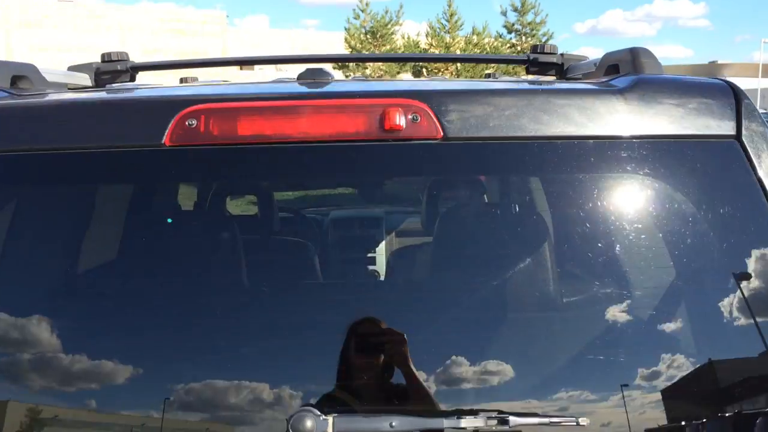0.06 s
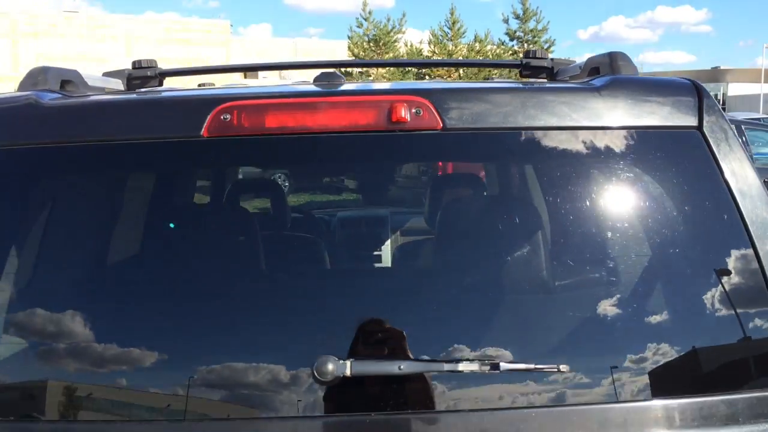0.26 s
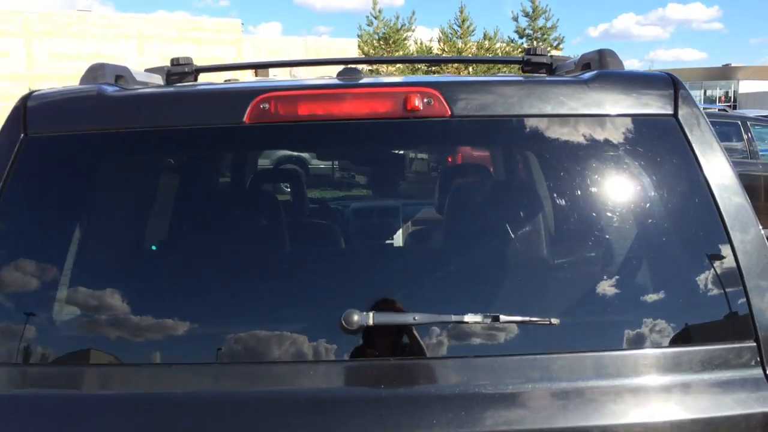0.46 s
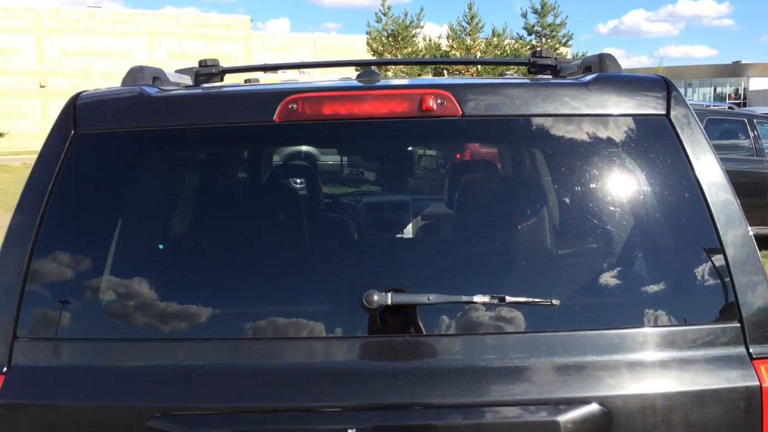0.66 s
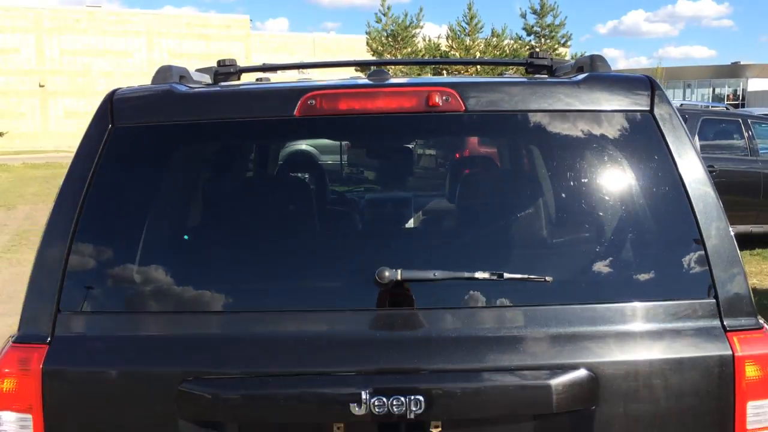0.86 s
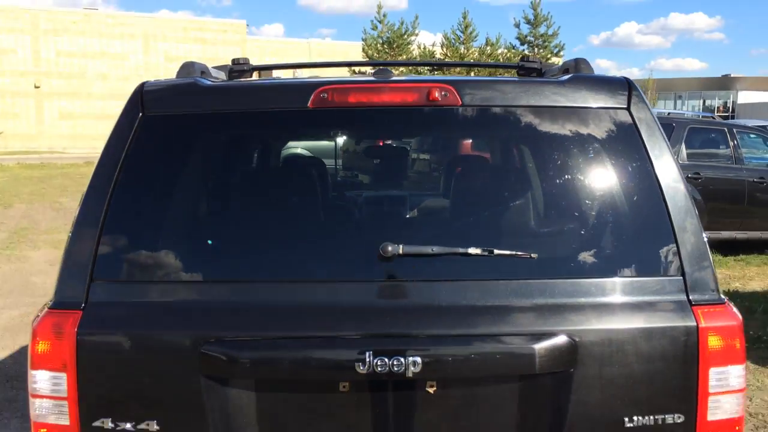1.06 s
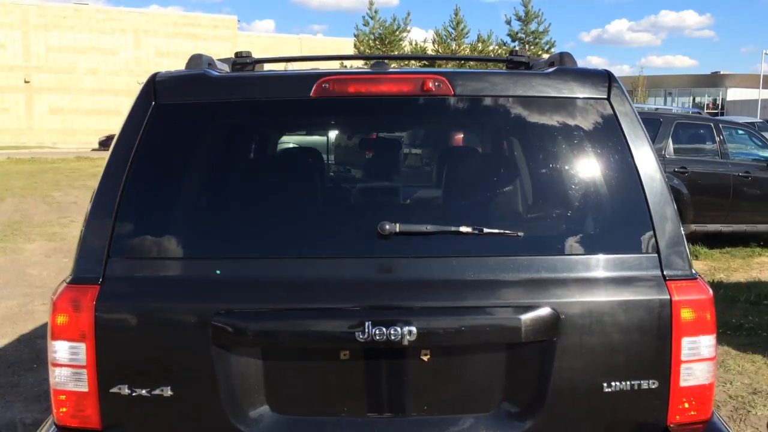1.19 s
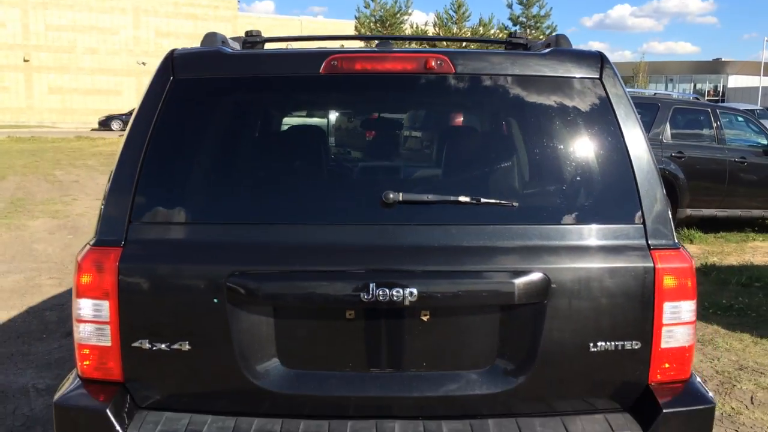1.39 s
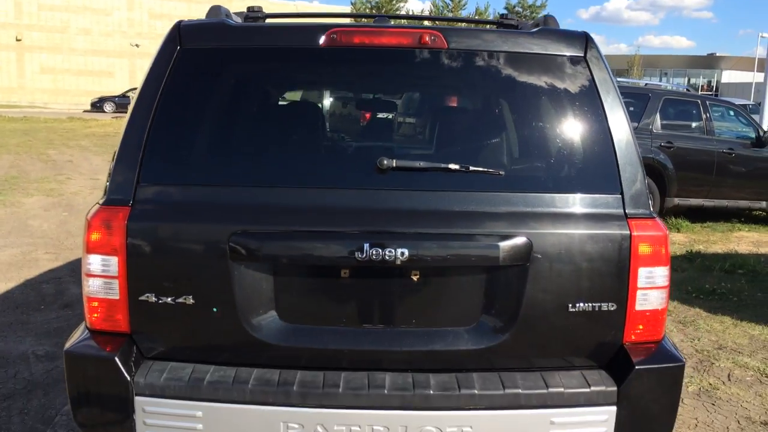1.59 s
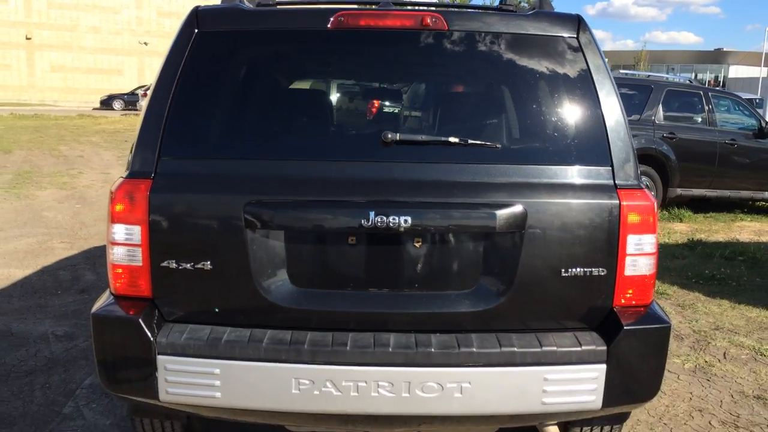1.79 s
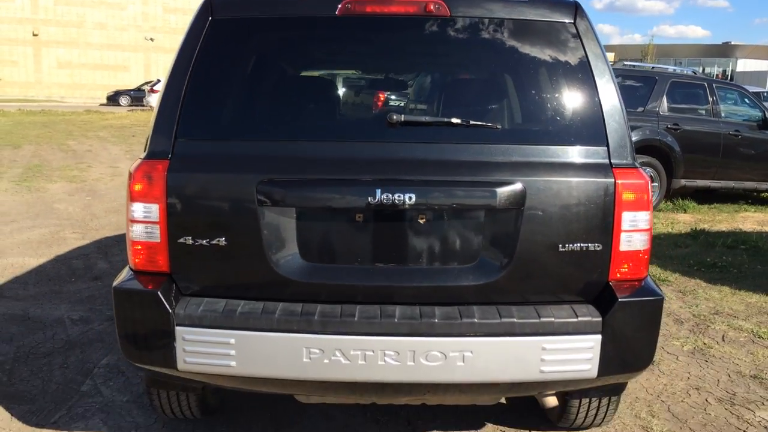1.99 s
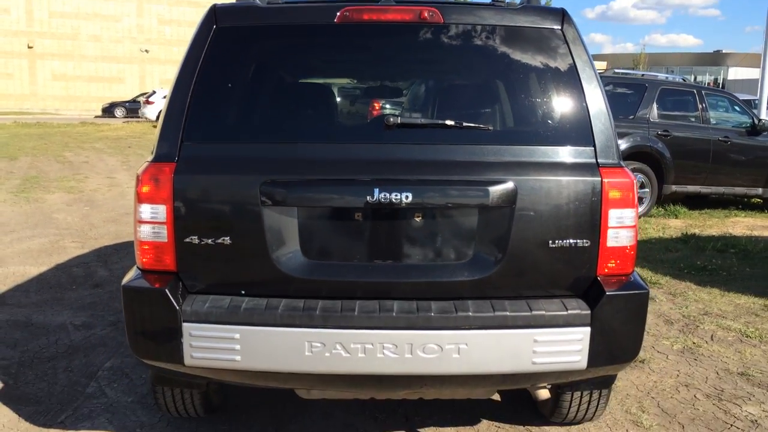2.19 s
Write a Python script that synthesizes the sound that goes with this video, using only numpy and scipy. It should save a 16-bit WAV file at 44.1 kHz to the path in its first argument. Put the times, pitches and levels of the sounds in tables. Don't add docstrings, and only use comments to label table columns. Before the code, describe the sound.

A vehicle's rear gate slams almost at once, a deep thud with metallic latch clack and brief faint rattle, close up in an open lot; afterwards wind bumps a hand-held microphone over faint distant traffic.

```python
import sys
import numpy as np
from scipy import signal
from scipy.fft import rfft, irfft
from scipy.io import wavfile
from scipy.ndimage import uniform_filter1d

SR = 44100
rng = np.random.default_rng(int(sys.argv[2]) if len(sys.argv) > 2 else 0)


def magnitude_from_level(level_db):
    exponent = np.asarray(level_db, float) / 20
    return 10 ** exponent


def unload_wav(signal):
    wavfile.write(
        sys.argv[1],
        SR,
        np.round(np.clip(np.atleast_2d(signal).T, -1, 1) * 32767).astype(np.int16),
    )


N = 99225

# (time [s], thump level [dB], crack level [dB], crack t60 [s], steel share [0-1])
GATE_BLOWS = [(0.1263, -11.5, -40, .05, .1), (.1345, -10, -24.5, 0.062, 0.84),
              (0.139, -18.5, -17, 0.033, 0.94), (.1425, -25, -18.5, .05, 0.99), (.151, -14, -31, 0.087, .6),
              (0.167, -17, -28.5, 0.14, 0.47), (.181, -9, -23.5, 0.085, 0.47),
              (.189, -12, -20.5, 0.044, 0.21), (.197, -13.5, -32, 0.092, 0.77),
              (.207, -15, -33, 0.033, 0.6), (0.227, -31, -51, .12, 0.5), (0.25, -28, -32, 0.09, 0.26),
              (0.2676, -26, -33.5, 0.052, 0.04), (0.277, -24, -45, 0.034, 0), (.295, -39, -42, 0.077, 0),
              (0.313, -35, -44, 0.053, 0.53), (0.319, -46, -59, 0.026, 0.3),
              (.258, -22.5, -43, 0.073, 0.56)]
# (time [s], level [dB], t60 [s])
TRIM_TICKS = [
    (.352, -72, 0.055),
    (0.3662, -43.5, 0.038),
    (0.3968, -43, 0.037),
    (0.465, -47, 0.037),
    (0.475, -49, 0.022),
    (0.491, -42, 0.064),
    (0.508, -46, 0.063),
    (0.528, -56, 0.065),
    (.548, -62, .06),
]
# (frequency [Hz], level [dB])
STEEL_SPECTRUM = [(180, -44), (300, -12), (484, -18.5), (2480, -15.5), (2980, -22.5), (7020, -12.5),
                  (8280, -23.5), (11500, -21), (15500, -32.5)]
# (frequency [Hz], level [dB])
TRIM_SPECTRUM = [(180, -31), (300, -11), (835, -8), (2170, -15), (2480, -10.5), (3690, -16.5),
                 (4350, -16.5), (13600, -36), (15500, -34)]
# (frequency [Hz], bandwidth [Hz], level [dB])
TRIM_MODES = [
    (1994, 20, -13.5),
    (2776, 32, -11.5),
    (4310, 360, -16.5),
    (5650, 180, -18),
]


def latch_and_trim():
    roughness = rng.standard_normal((2, N))
    roughness *= magnitude_from_level(14.835 * uniform_filter1d(rng.standard_normal(N), 30))
    modes = sum(magnitude_from_level(db) * evened(resonate(roughness[1], hz, width)) for hz, width, db in TRIM_MODES)
    steel = split(shaped(roughness[0], STEEL_SPECTRUM))
    trim = split(shaped(roughness[1], TRIM_SPECTRUM) + modes)
    out = np.zeros(N)
    for s, _, crack_db, t60, share in GATE_BLOWS:
        material = trim + np.clip(share, 0, 1) * (steel - trim)
        out += burst(s, crack_db, t60, material)
    tick_noise = trim * magnitude_from_level(np.array([[0], [-5]]))
    for s, db, t60 in TRIM_TICKS:
        out += burst(s, db, t60, tick_noise)
    return out


def burst(s, db, t60, noise):
    rise_s, treble_share = 0.0014, 0.69
    t = np.maximum(np.arange(N) / SR - s, 0)
    low = magnitude_from_level(-60 * t / t60) * noise[0]
    high = magnitude_from_level(-60 * t / t60 / treble_share) * noise[1]
    return np.minimum(t / rise_s, 1) * magnitude_from_level(db) * (low + high)


def split(x):
    low = signal.filtfilt(*signal.butter(2, 4500, fs=SR), x)
    return np.array([low, x - low])


# (frequency [Hz], level [dB], t60 [s])
BODY_MODES = [(58, -2.5, 0.37), (90, -6, 0.09), (160, -5.5, 0.13), (200, -9, 0.12), (270, -6.5, 0.14),
              (330, -20, 0.17), (450, -12, 0.17), (498.3, -13.5, 0.19), (580, -26, .1), (694, -15, 0.18),
              (849, -18.5, 0.32), (1044, -13, 0.19), (1184, -22, 0.082), (1344, -13, 0.063)]


def body_ring(shake):
    push = np.zeros(N)
    for s, thump_db, *_ in GATE_BLOWS:
        push[round(s * SR)] += magnitude_from_level(thump_db)
    shell_db = -26.5
    push += magnitude_from_level(shell_db) * shake * rng.standard_normal(N)
    t = np.arange(SR // 2) / SR
    ring = sum(magnitude_from_level(db - 9 - 60 * t / t60) * np.sin(2 * np.pi * hz * t) for hz, db, t60 in BODY_MODES)
    return signal.fftconvolve(push, ring)[:N]


# (time [s], level [dB])
SHAKE_ENVELOPE = [
    (.07, -52.5),
    (0.119, -32.5),
    (.135, -14.5),
    (0.198, -15.5),
    (.24, -25.5),
    (.3, -37.5),
    (.4, -46.5),
    (.55, -55),
]


def shake_envelope():
    s, db = np.transpose(SHAKE_ENVELOPE)
    return magnitude_from_level(np.interp(np.arange(N) / SR, s, db, left=-120, right=-90))


# (frequency [Hz], level [dB])
SHAKE_SPECTRUM = [(30, 3), (92, 0), (230, 0), (480, -16), (900, -15.5), (1630, -29), (4000, -35.5),
                  (12000, -54)]


def shudder(shake):
    return shake * shaped(rng.standard_normal(N), SHAKE_SPECTRUM)


def cabin_boom():
    start_s, length_s, first_hz, last_hz, level_db = .139, .062, 49, 160, -9.5
    u = np.clip((np.arange(N) / SR - start_s) / length_s, 0, 1)
    hz = (u > 0) * first_hz * (last_hz / first_hz) ** u
    swell = np.sin(np.pi * u ** .8) ** 0.73
    return -magnitude_from_level(level_db) * swell * np.sin(2 * np.pi * np.cumsum(hz) / SR)


def gate():
    shake = shake_envelope()
    seal_smack = pop(.1353, -5, 450)
    return latch_and_trim() + body_ring(shake) + shudder(shake) + cabin_boom() + seal_smack


def pop(s, db, hz, way=1, swing=0.1):
    u = (np.arange(N) / SR - s) * hz * 2 * np.pi
    even = (1 - swing) * (1 - 0.18 * u ** 2)
    odd = swing * 1.59 * u
    return np.sign(way) * magnitude_from_level(db) * (even - odd) / (1 + 0.21 * u ** 2) ** 2.72


# (time [s], level [dB], pitch [Hz], push +1 or pull -1, swing [0-1])
WIND_POPS = [(0.5847, -18.5, 68.6, 1, 0.05), (0.983, -23.5, 151, 1, .3), (.987, -24.5, 250, 1, 0.45),
             (0.9914, -10.5, 108, -1, 0.68), (1.0501, -4.5, 139, 1, 0.56), (1.1022, -17.5, 208, 1, 0.84),
             (1.1068, -17.5, 129, 1, 0), (1.2506, -16.5, 152, 1, 0.14), (1.2547, -10.5, 301, -1, 0.97),
             (1.259, -19.5, 251, 1, 0), (1.7371, -19.5, 158, 1, 0.47), (1.733, -29, 200, -1, 0.03),
             (1.7425, -24.5, 300, 1, 0.45), (1.746, -22.5, 81, -1, 0.1), (1.756, -24.5, 108, 1, 0.35)]
# (start [s], length [s], level [dB], pitch [Hz])
WIND_FLUTTERS = [(0, 0.035, -38, 90), (.51, 0.14, -37.5, 113), (.78, 0.069, -41, 118),
                 (.965, 0.21, -33, 115.5), (1.13, 0.054, -41, 108), (1.254, 0.027, -31, 220),
                 (1.27, 0.068, -38, 173), (1.36, 0.13, -40, 101), (1.49, 0.093, -34.5, 160),
                 (1.6, 0.075, -41, 130), (1.725, .055, -31.5, 90), (1.84, 0.037, -40, 109),
                 (1.98, 0.048, -45.5, 102), (2.09, 0.095, -43, 130), (2.18, 0.051, -41, 127),
                 (.001, 0.093, -45.5, 330), (1.526, 0.042, -40, 251), (1.632, 0.032, -45.5, 250),
                 (1.299, 0.018, -40, 263)]


def wind():
    out = sum(pop(*row) for row in WIND_POPS)
    eddies = rng.standard_normal((len(WIND_FLUTTERS), SR // 4))
    for (s, length, db, hz), eddy in zip(WIND_FLUTTERS, eddies):
        sparse = eddy ** 3
        lumps = evened(resonate(resonate(sparse, hz, .9 * hz), 1.24 * hz, 7.2 * hz))
        u = np.clip(np.arange(len(eddy)) / SR / length, 0, 1)
        add(out, s, magnitude_from_level(db) * np.sin(np.pi * u ** 0.79) ** 0.45 * lumps)
    foam_hz = 840
    return signal.sosfiltfilt(signal.butter(5, foam_hz, fs=SR, output="sos"), out)


# (frequency [Hz], level [dB])
LOT_SPECTRUM = [(25, -11), (64, 2), (300, -12.5), (1000, -19.5), (2000, -27.5), (2600, -35), (5300, -40.5),
                (15500, -55)]
# (frequency [Hz], bandwidth [Hz], level [dB])
FAR_BANDS = [
    (3145, 130, -1.5),
    (4970, 980, 0),
    (6910, 84, -10),
]


def lot():
    wash_db, bands_db = -46.5, -76.5
    z = signal.stft(shaped(rng.standard_normal(N), LOT_SPECTRUM), nperseg=1024, noverlap=768)[2]
    patches = uniform_filter1d(rng.standard_normal(z.shape), 12, 0)
    patches = evened(uniform_filter1d(patches, 12, 1))
    wash = evened(signal.istft(z * magnitude_from_level(0.54 * patches), nperseg=1024, noverlap=768)[1][:N])
    drift = evened(uniform_filter1d(rng.standard_normal(N), 2500))
    hiss = rng.standard_normal(N) * magnitude_from_level(3.2 * drift)
    bands = sum(magnitude_from_level(bands_db + db) * evened(resonate(resonate(hiss, hz, width), hz, width))
                for hz, width, db in FAR_BANDS)
    return (magnitude_from_level(wash_db) * wash + bands) * duck_gain()


def duck_gain():
    duck_db, hold_s, back_s = -9, 0.47, 0.039
    t = np.arange(N) / SR
    ducked = (t > GATE_BLOWS[1][0]) / (1 + np.exp((t - hold_s) / (back_s / 4)))
    return magnitude_from_level(duck_db * ducked)


def evened(x):
    return x / np.sqrt(np.mean(x ** 2) + 1e-20)


def shaped(x, points):
    f, db = np.transpose(points)
    hz = np.fft.rfftfreq(len(x), 1 / SR)
    gain = magnitude_from_level(np.interp(np.log(hz + 1), np.log(f), db, left=-60))
    return evened(irfft(rfft(x) * gain, len(x)))


def resonate(x, hz, width):
    r = np.exp(-np.pi * width / SR)
    return signal.lfilter([1 - r], [1, -2 * r * np.cos(2 * np.pi * hz / SR), r * r], x)


def add(mix, s, sound):
    part = mix[round(s * SR):][:len(sound)]
    part += sound[:len(part)]


def scene():
    return (gate() + wind() + lot())[None]


def top_cut(x):
    return signal.sosfilt(signal.butter(12, 15960, fs=SR, output="sos"), x)


def record(dry):
    ceiling, edge_hz = .95, 15450
    cut = signal.sosfiltfilt(signal.butter(2, 38, "high", fs=SR, output="sos"), dry)
    overloaded = ceiling * np.tanh(cut / ceiling)
    edge = signal.firwin(255, edge_hz, window=("kaiser", 9), fs=SR)[None]
    mix = signal.oaconvolve(overloaded, edge, "same")
    return top_cut(mix)


dry = scene()
out = record(dry)
unload_wav(out)
```